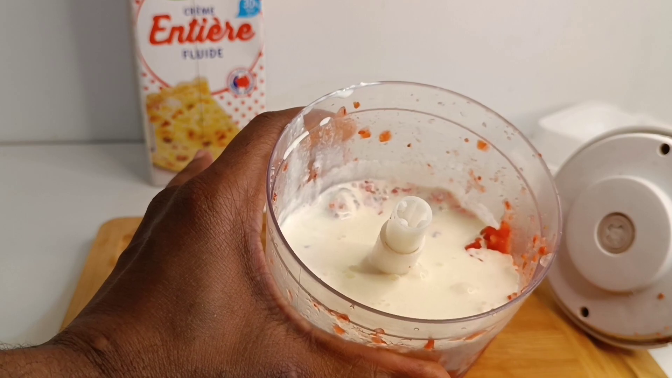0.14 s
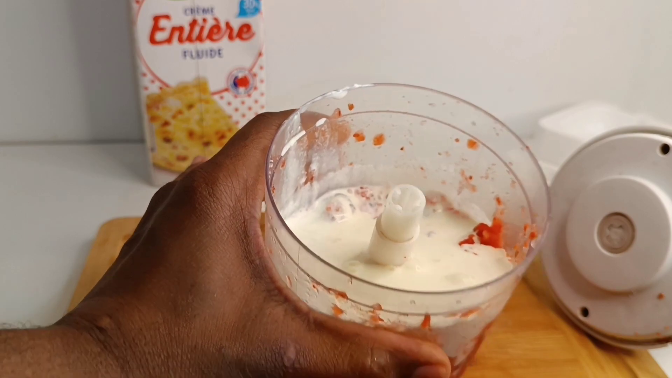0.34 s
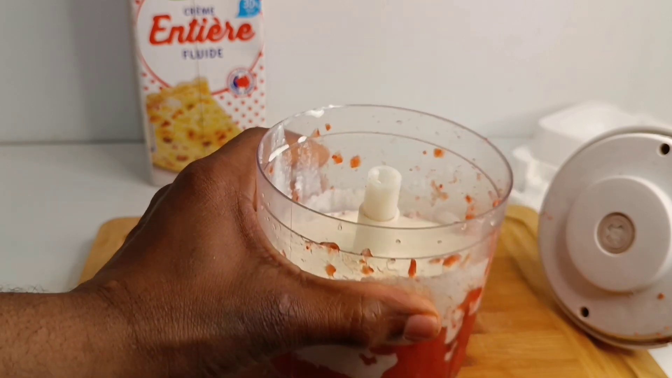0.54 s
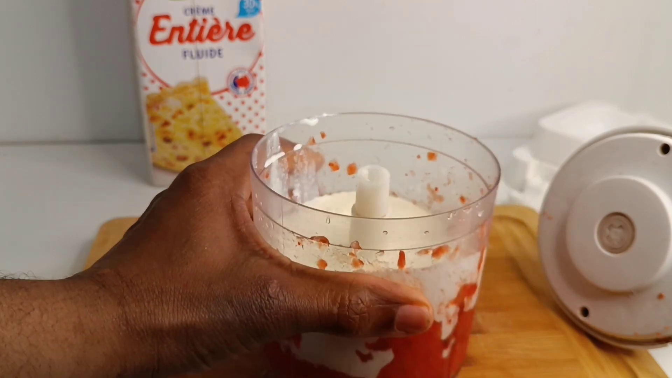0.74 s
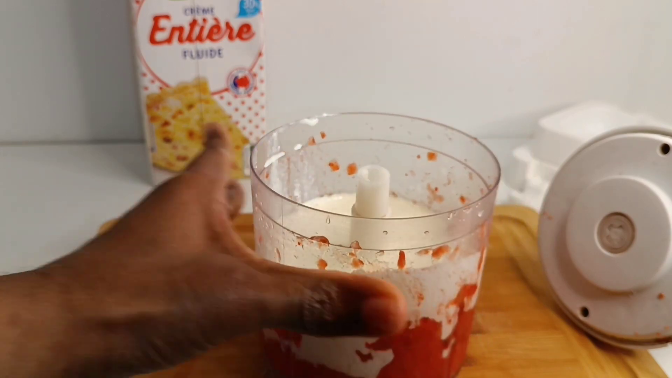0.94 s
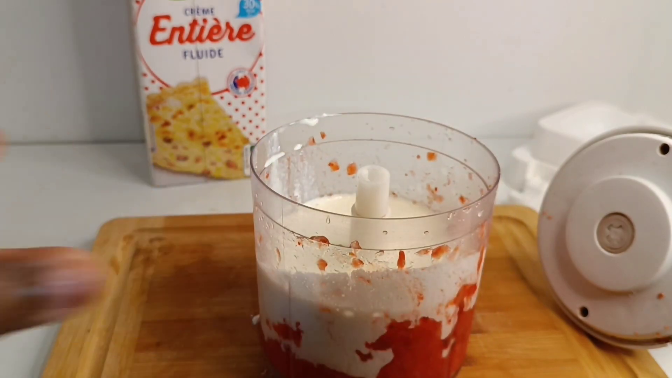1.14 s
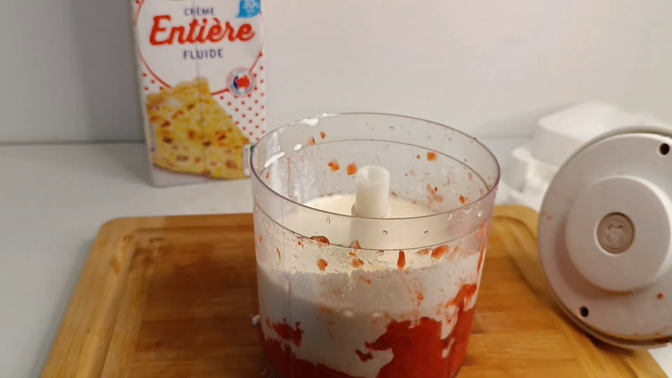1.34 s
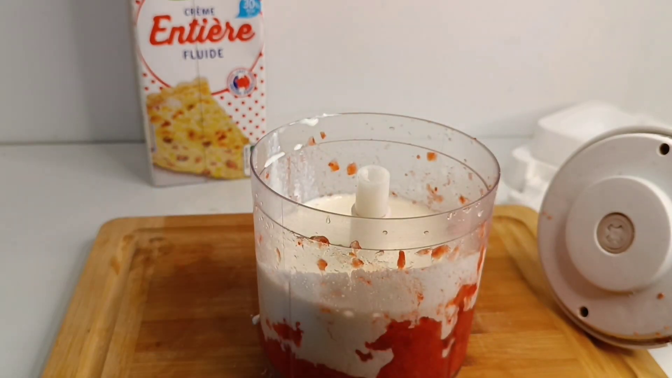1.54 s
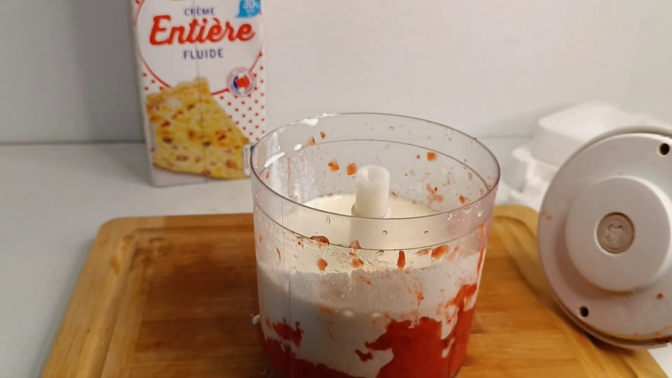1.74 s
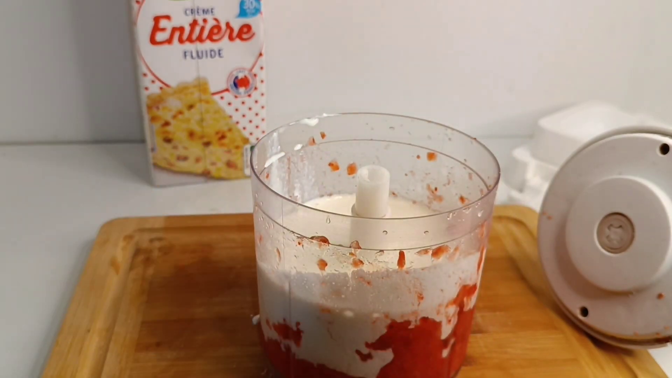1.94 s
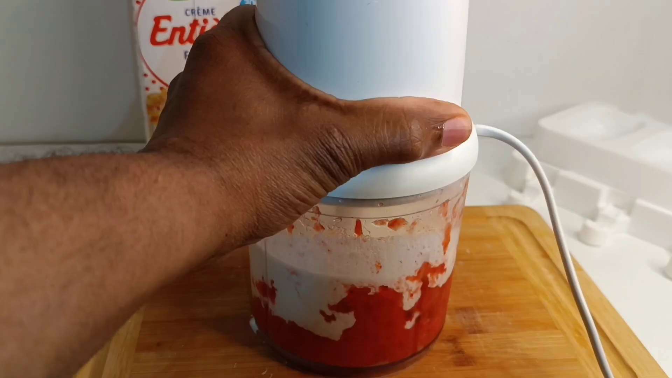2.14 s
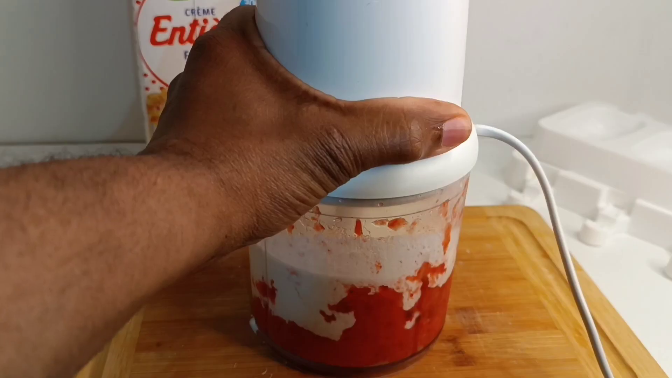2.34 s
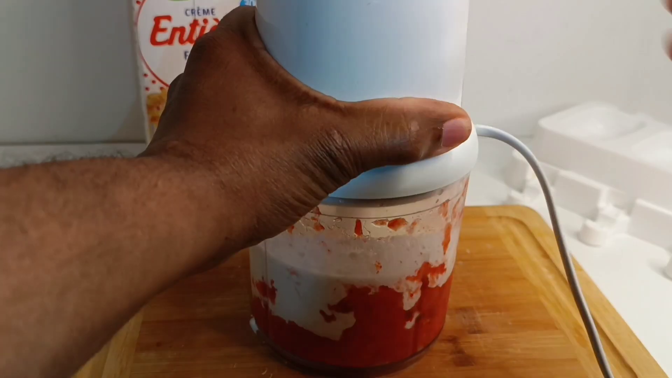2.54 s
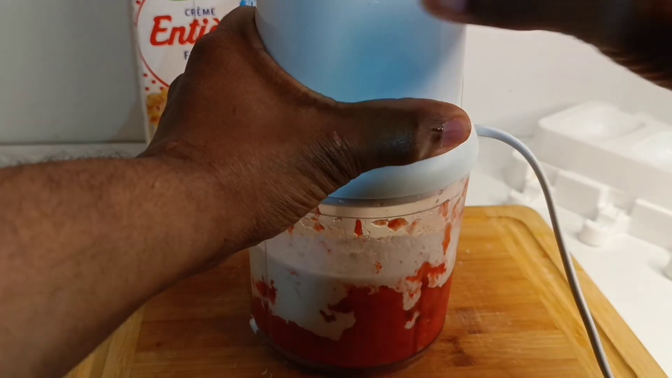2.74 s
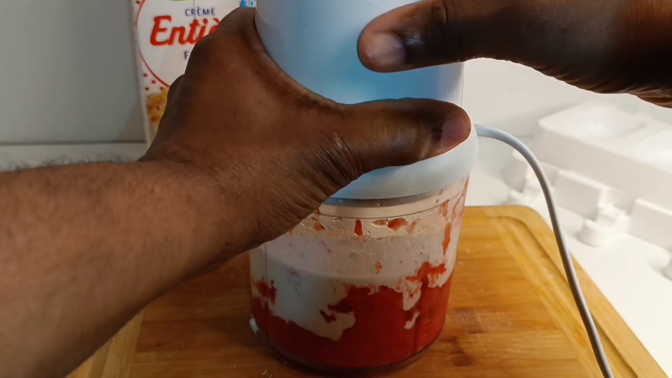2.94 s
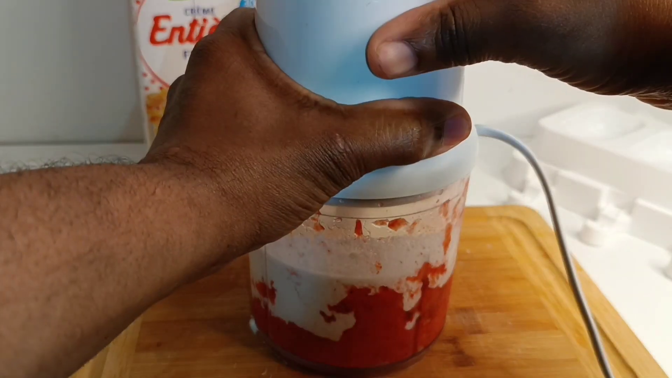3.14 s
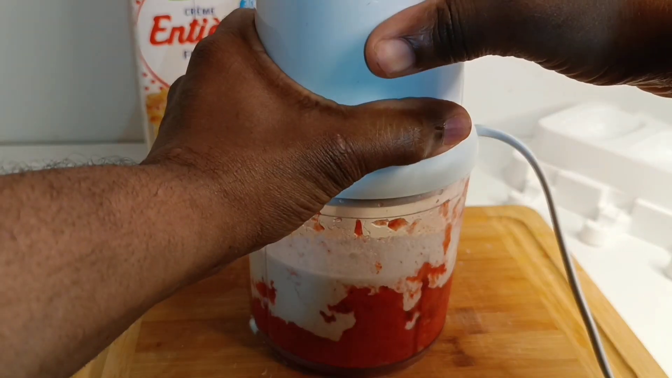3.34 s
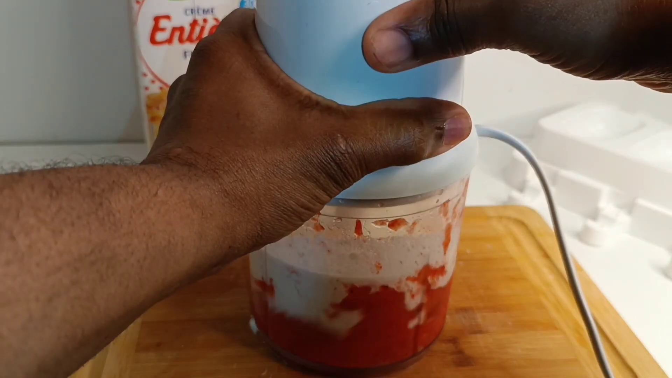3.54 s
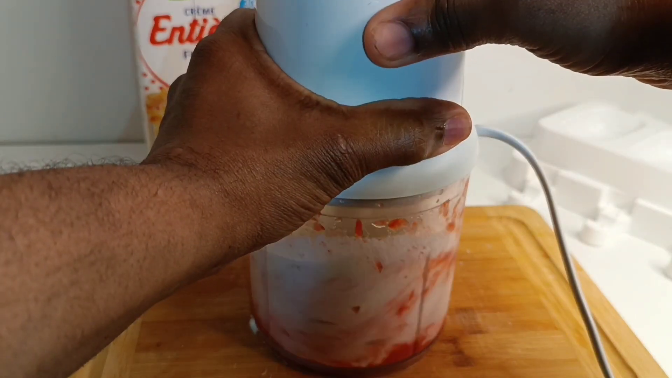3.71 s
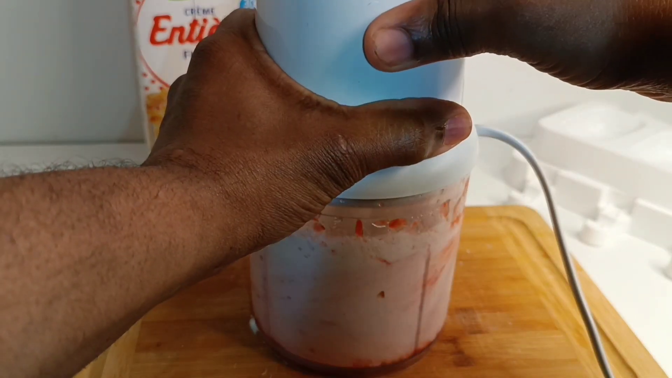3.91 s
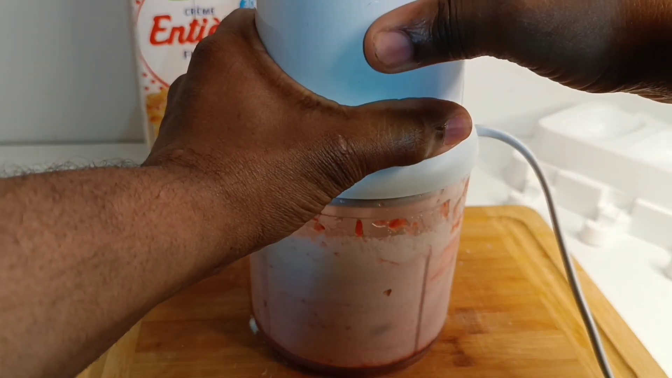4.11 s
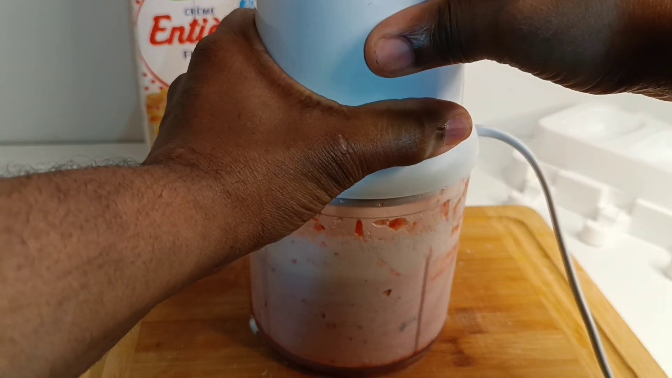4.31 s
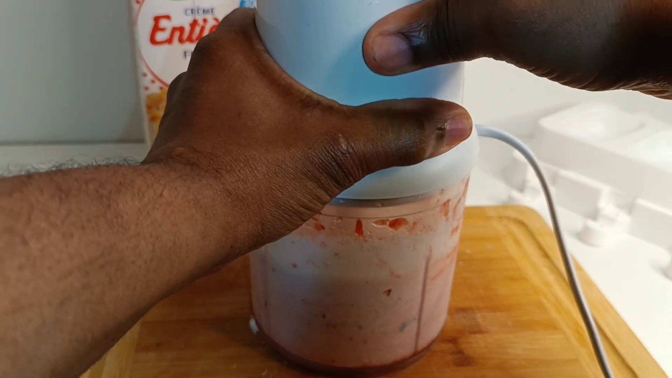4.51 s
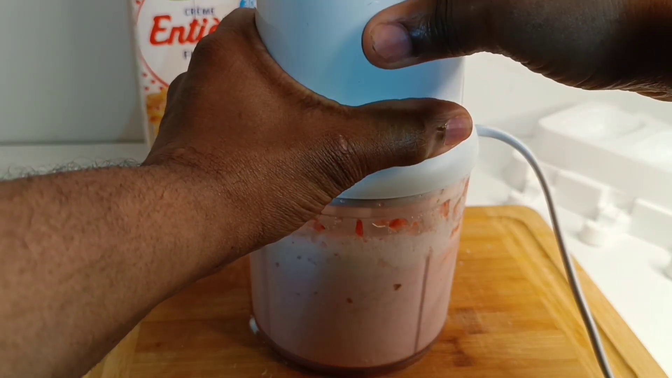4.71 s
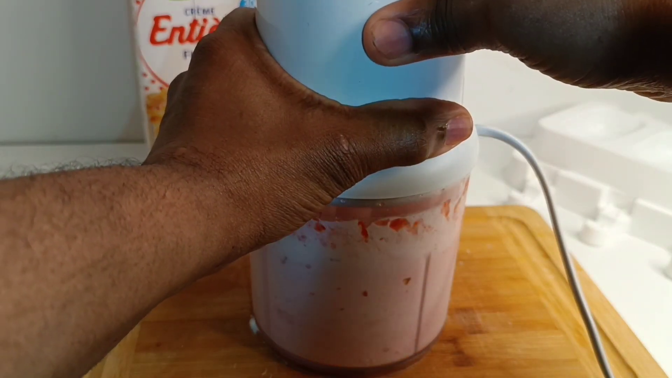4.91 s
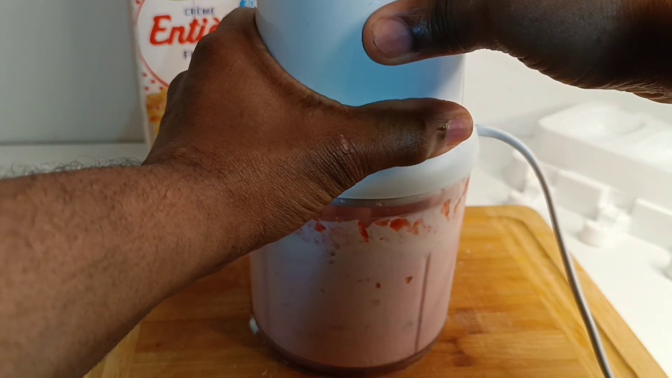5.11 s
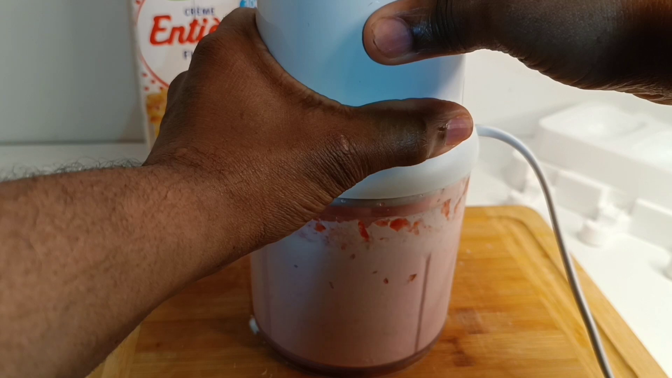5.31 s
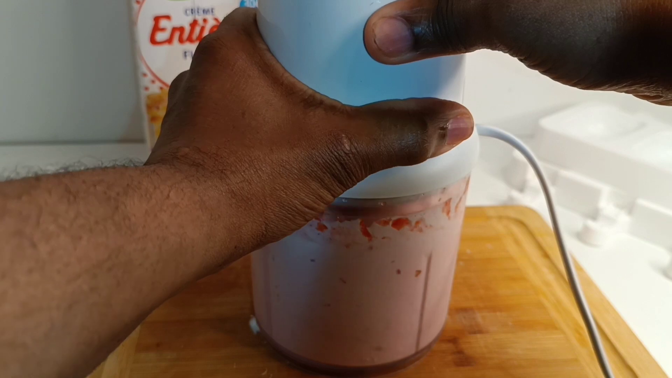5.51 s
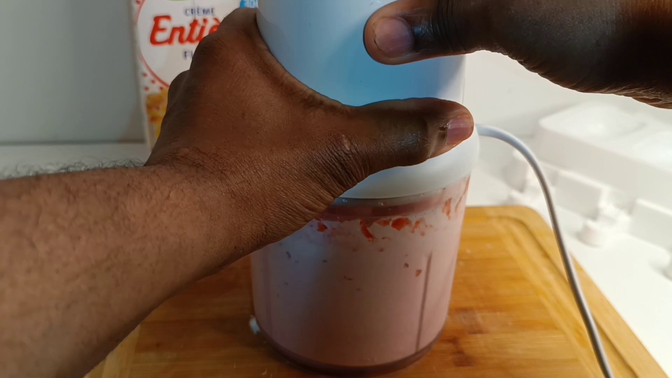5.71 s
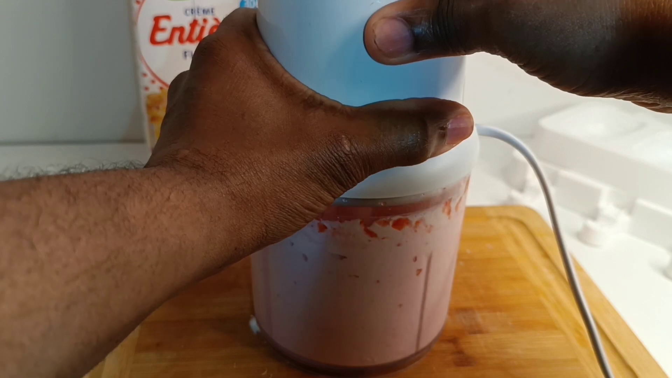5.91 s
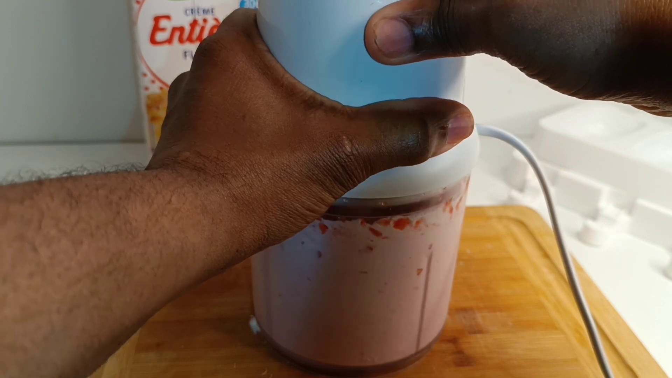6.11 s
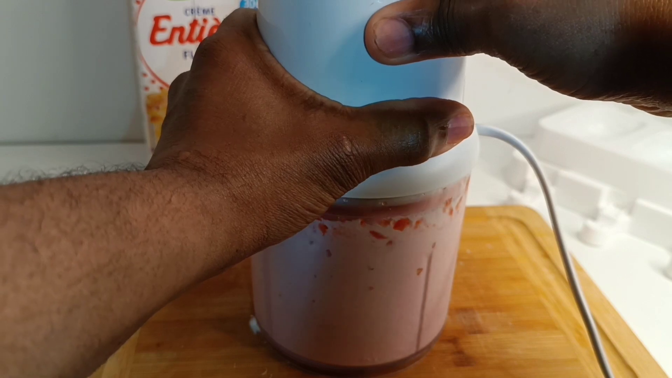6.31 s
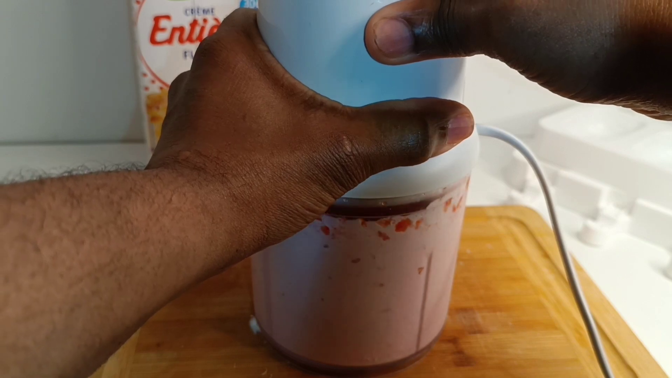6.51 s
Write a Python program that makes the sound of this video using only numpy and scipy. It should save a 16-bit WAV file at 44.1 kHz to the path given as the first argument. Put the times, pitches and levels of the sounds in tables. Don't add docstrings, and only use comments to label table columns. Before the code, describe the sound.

Close-up in a small, lightly echoing kitchen: one solid thud and clack of a bowl on board, a near-silent pause with faint skin-on-plastic rubs, then a scuff and knock as the motor head goes on. A brief rough motor burst winds down; a longer one spins up with humming, noisy chopping and a piercing whine that sags as fruit catches the blades.

```python
import sys
import numpy as np
from scipy import signal
from scipy.io import wavfile
from scipy.ndimage import uniform_filter1d

SR = 44100
rng = np.random.default_rng(int(sys.argv[2]) if len(sys.argv) > 2 else 0)


def decibels_to_gain(level_db):
    exponent = np.asarray(level_db, float) / 20
    return 10 ** exponent


def int16_out(signal):
    q = np.round(np.clip(np.atleast_2d(signal).T, -1, 1) * 32767)
    wavfile.write(sys.argv[1], SR, q.astype(np.int16))


N = 288855
TIME_S = np.arange(N) / SR
FIRST_RUN = TIME_S < 4.2

# frequency in Hz, width in Hz, boost in dB.
BOWL_MODES = [(151.3, 12, 5.5), (293.4, 17, 2), (448, 25, 7), (870, 140, 6.5), (1250, 27, 10),
              (1492.8, 94, 9), (1696.3, 52, 7.5), (1925, 59, 7.5), (2377, 100, 6), (2980, 150, 4),
              (4478, 31, 8), (5850, 186, 9.5), (6371, 63, 11.5), (7030, 300, 8)]
# time in seconds, peak level in dB.
LUMPS = [
    (3.91, -44),
    (5.152, -11),
    (5.18, -11),
    (5.242, -25),
    (5.409, -20),
    (5.46, -26),
    (5.5, -36),
    (6.032, -17.5),
]
# time in seconds, level in dB.
BLADE_LOAD = [
    [(3.258, -19.5), (3.29, -21), (3.46, -21), (3.6, -21), (3.708, -20.5), (3.824, -26.5), (3.92, -41.5),
     (3.994, -70), (4.1, -72)],
    [(4.284, -21), (4.87, -20), (5.0, -25), (5.11, -27.5), (5.3, -27.5), (5.47, -26), (5.6, -27),
     (6.55, -29.5)],
]
# time in seconds, half length in seconds, low-end gain in dB.
SLUMPS = [
    (3.447, 0.071, 4.5),
    (5.018, .04, 8),
    (5.385, .045, 9),
    (5.678, .06, 2.5),
    (6.311, .05, 2),
]
TOP_HZ = 2600
THAW_AT_S, THAW_S, THAW_FIZZ_DB, THAW_WOBBLE_DB = 4.89, 0.02, -5, -5


def rms_one(x):
    return x / np.sqrt(np.mean(x ** 2) + 1e-20)


def band(x, low_hz, high_hz, order=2):
    return signal.sosfilt(signal.butter(order, [low_hz, high_hz], "band", fs=SR, output="sos"), x)


def resonance(x, hz, width):
    r = np.exp(-np.pi * width / SR)
    poles = [1, -2 * r * np.cos(2 * np.pi * hz / SR), r * r]
    return signal.lfilter([(1 - r * r) / 2, 0, (r * r - 1) / 2], poles, x)


def boosted(x, peaks):
    for hz, width, boost_db in peaks:
        x = x + (decibels_to_gain(boost_db) - 1) * resonance(x, hz, width)
    return x


def at_hz(points, hz):
    points_hz, values = np.array(points).T
    return np.interp(np.log(hz), np.log(points_hz), values)


def drift(rate):
    r = np.exp(-80 * np.pi * rate / SR)
    slow = signal.lfilter([1], [1, -2 * r, r * r], rng.standard_normal(N // 40 + 2002))[2000:]
    return np.interp(np.arange(N) / 40, np.arange(len(slow)), rms_one(slow))


def sine(hz, jitter_hz, rate):
    return np.sqrt(2) * np.sin(2 * np.pi * np.cumsum(hz + jitter_hz * drift(rate)) / SR)


def step(at_s, length_s):
    return 0.5 + 0.5 * np.tanh((TIME_S - at_s) / length_s)


def bumps(times, lengths, heights):
    return sum(h * np.exp(-((TIME_S - s) / w) ** 2) for s, w, h in zip(times, lengths, heights))


def swells(rows):
    gain = 0
    for s, db, rise_s, fall_s in rows:
        below_peak = np.maximum((s - TIME_S) / abs(rise_s), (TIME_S - s) / abs(fall_s))
        gain = gain + decibels_to_gain(db - 20 * below_peak)
    return gain


def in_time(rows, fade_s=0.014):
    s, *columns = np.transpose(rows)
    inside_s = np.minimum(TIME_S - s[0] + fade_s, s[-1] + fade_s - TIME_S)
    gate = np.clip(inside_s / fade_s, 0, 1) ** 2
    return [gate] + [np.interp(TIME_S, s, c) for c in columns]


def banded(source, spectrum, patchy_db, low_db=0, high_db=0):
    # frequency in Hz, left-right likeness from 0 to 1.
    likeness = [(60, 1), (180, 0.91), (550, 0.65), (1650, 0.29), (4970, 0.22), (15000, 0.1)]
    # frequency in Hz, left minus right level in dB.
    left_lean = [(60, -2), (180, 2), (550, 1.5), (1650, 3.5), (4970, -3.5), (15000, 4)]
    out = 0
    edges = 28 * 2 ** (np.arange(29) / 3)
    for k, (low, high) in enumerate(zip(edges, edges[1:])):
        mid, side = band(source[k % 2], low, high)
        hz = np.sqrt(low * high)
        alike = np.clip(at_hz(likeness, max(hz, 61)), -1, 1)
        lean = at_hz(left_lean, max(hz, 61)) / 2
        tilt = low_db * at_hz([(400, 0.942), (800, 0)], hz) + high_db * at_hz([(3500, 0.14), (6000, 0.88)], hz)
        gain = decibels_to_gain(at_hz(spectrum, hz) + tilt + patchy_db * drift(11))
        pair = np.sqrt(1 + alike) * mid + np.sqrt(1 - alike) * side * [[1], [-1]]
        out = out + gain * decibels_to_gain(np.array([[lean], [-lean]])) * pair
    return rms_one(out)


def struck(times, levels_db, modes, spread_db):
    at, out = (np.array(times) * SR).astype(int), np.zeros(N)
    chance = rng.normal(0, 1, (len(at), len(modes)))
    for k, (hz, db, t60) in enumerate(modes):
        clicks = np.full(N, 1e-18)
        clicks[at] = decibels_to_gain(np.array(levels_db) + db + spread_db * chance[:, k])
        r, w = decibels_to_gain(-60 / (t60 * SR)), 2 * np.pi * hz / SR
        out += signal.lfilter([0, np.sin(w)], [1, -2 * r * np.cos(w), r * r], clicks)
    return out


def bursts(times, levels_db, t60, rise_s):
    out, t = np.zeros(N), np.arange(SR // 8) / SR
    noise = rng.standard_normal((len(times), len(t)))
    for s, db, row in zip(times, levels_db, noise):
        at = int(s * SR)
        out[at:at + len(t)] += decibels_to_gain(db - 60 * t / t60) * np.clip(t / rise_s, 0, 1) * row
    return out


def background():
    # frequency in Hz, density in dB per Hz.
    quiet = [(15, -45), (25, -13), (43, -12), (148, -4), (250, -7), (293, -9.5), (342, -4.5), (625, -17.5),
             (1600, -19.5), (2140, -16.5), (8120, -40.5), (13000, -44)]
    # frequency in Hz, rms level in dB.
    compressor = [(145.3, -80.5), (247.6, -78), (344.5, -77), (393.0, -91.5), (500.6, -86)]
    # time in seconds, level in dB, rise and fall in
    # seconds per 20 dB.
    rub_strokes = [
        (0.62, -74.5, 0.209, .25),
        (1.1, -75, .55, 0.4),
        (2.19, -76.5, 0.28, -3.8),
        (2.51, -55, 0.1, -0.16),
        (2.556, -44, 0.012, 0.01),
        (2.74, -71.5, .15, -1),
    ]
    # frequency in Hz, density in dB per Hz.
    rub_colour = [(470, -36.5), (800, -7.5), (1340, -20), (1750, -8), (2080, -12.5), (6380, -5),
                  (12000, -26.5), (15500, -18.5)]
    # time in seconds, level in dB, rise and fall in seconds per 20 dB.
    shakes = [
        (1.022, -67, .05, .05),
        (1.22, -69, .08, .07),
        (1.47, -63, .12, .22),
        (1.62, -65, .2, .04),
        (2.06, -70, .07, .2),
        (2.24, -66, .15, .05),
        (2.5, -76, .1, .03),
    ]
    white = rng.standard_normal((2, 2, N))
    room = decibels_to_gain(-71 + 0.5) * banded(white, quiet, 1.1)
    fridge = sum(decibels_to_gain(db + 2.5 * drift(9.8)) * sine(hz, 2.7, 12) for hz, db in compressor)
    rub = swells(rub_strokes) * banded(white[::-1, ::-1, ::-1], rub_colour, 1.7)
    shake = swells(shakes) * rms_one(resonance(white[0, 0, ::-1], 120, 28))
    return room + fridge + rub + shake


def knocks():
    # time in seconds, board thud, plastic clack and latch tick in dB, clack centre in Hz.
    contacts = [(0.308, -39, -80, -89, 600), (0.366, -16, -9, -58, 660), (1.001, -67, -75, -78, 603),
                (1.639, -65, -70.5, -82.5, 1740), (2.194, -62, -54.5, -76, 900),
                (2.391, -74.5, -54, -65, 1250), (2.552, -30.5, -31, -59, 690),
                (2.992, -33, -44.5, -42, 600), (3.188, -65, -72.5, -49.5, 875),
                (3.968, -46.5, -64.5, -66, 754), (4.111, -54, -52.5, -72, 770),
                (4.152, -43, -73.5, -50.5, 748), (4.172, -47, -73, -56, 600)]
    # frequency in Hz, level in dB, 60 dB decay in seconds.
    board = [(100, -6, 0.47), (148, -6, 0.56), (160.4, 0, .35), (209, -5.5, 0.27), (287.6, -12, 0.24),
             (352, -9, 0.069), (55.12, -11, 0.5)]
    # frequency in Hz, width in Hz, boost in dB.
    plastic = [(621, 60, 7), (760, 92, 1.5), (980, 61, 0), (1200, 200, 5.5), (1530, 68, 3), (1830, 150, 0),
               (2192, 120, 6.5), (2365, 100, 3.5), (2947, 210, 1.5), (3600, 200, 5.5)]
    # frequency in Hz, width in Hz, boost in dB.
    latch = [(4840, 90, 12), (6100, 400, 9.9), (9300, 700, 3.4), (10700, 760, 1.9)]
    # time in seconds, level in dB, rise and fall in seconds per 20 dB.
    seat_booms = [
        (2.556, -32, .002, .035),
        (2.6, -52, .04, .3),
        (3.917, -36, .005, .05),
    ]
    s, thud_db, clack_db, tick_db, centre_hz = np.transpose(contacts)
    s = s + 0.0013
    held = s > 2.0
    damped = [(hz, db, t60 * 0.642) for hz, db, t60 in board]
    free_thud = struck(s[~held], thud_db[~held] - 3.5, board, spread_db=0.0)
    held_thud = struck(s[held], thud_db[held] - 2.5, damped, spread_db=3.5)
    thud = band(free_thud + held_thud, 60, 630)
    clack = sum(resonance(bursts([at], [db + 14.5], 0.039, 0.003), hz, 1.2 * hz)
                for at, db, hz in zip(s, clack_db, centre_hz))
    tick = boosted(band(bursts(s, tick_db + 3.0, 0.028, 0.0008), 3000, 17000), latch)
    lumps = band(bursts(*np.transpose(LUMPS), 0.066, 0.0014), 660, 1520) * decibels_to_gain(7.0)
    seat = swells(seat_booms) * rms_one(band(rng.standard_normal(N), 330, 1000))
    return thud, band(boosted(clack + lumps, plastic), 290, 3200) + tick + seat


def kitchen(x):
    # low edge in Hz, high edge in Hz, 60 dB decay in seconds, level in dB.
    echo_bands = [(59.6, 650, 0.39, 4.5), (680, 4380, 0.46, -0.5), (3500, 21000, 0.39, -5.5)]
    t = np.arange(SR // 2) / SR
    tail = sum(decibels_to_gain(db - 60 * t / t60) * band(rng.standard_normal((2, len(t))), low, high)
               for low, high, t60, db in echo_bands)
    tail = tail * np.clip(t / 0.012, 0, 1) / np.sqrt(SR / 40)
    return signal.fftconvolve(x[None], tail, axes=1)[:, :N]


def speed():
    # start in seconds (the sound enters already turning), off in seconds, slot rate at the
    # start in Hz, tone in dB, time it settles in seconds.
    presses = [
        (3.258, 3.605, 981.3, -26.5, 3.704),
        (4.285, 7.0, 1078, -28, 4.54),
    ]
    creep_hz_per_s, spin_up_s, coast_s = 10, 0.112, 0.14
    settle_db, settle_length_s = -9.5, 0.03
    runs = []
    for on_s, off_s, first_hz, db, settle_s in presses:
        since = np.clip(TIME_S - on_s, 0, off_s - on_s)
        hz = TOP_HZ + creep_hz_per_s * since - (TOP_HZ - first_hz) * np.exp(-since / spin_up_s)
        coasting = np.exp(-np.maximum(TIME_S - off_s, 0) / coast_s)
        runs.append([hz * coasting, db + settle_db * step(settle_s, settle_length_s)])
    return np.where(FIRST_RUN, *runs)


def caught():
    # time in seconds, half length in seconds, mesh sag in Hz, whine loss in dB.
    catches = [
        (5.03, .025, 70, 4),
        (5.185, .04, 290, 8),
        (5.37, .03, 90, 3),
        (5.46, .055, 330, 2),
        (5.64, .05, 40, 4),
        (5.75, .05, 260, 11),
        (5.99, .07, 80, 0),
        (6.09, .04, 400, 10),
        (6.23, .035, -110, 2),
        (6.345, .06, 170, -4),
    ]
    s, length_s, sag_hz, loss_db = np.transpose(catches)
    return bumps(s, length_s, sag_hz), bumps(s, length_s, loss_db)


def chopping():
    # frequency in Hz, density in dB per Hz.
    roar_colour = [(24, -60.5), (40, -31), (98, -7.5), (179, -6.5), (305, -4), (533, -18), (865, -16),
                   (1100, -19), (1240, -15.5), (2120, -18), (2450, -10.5), (4170, -20.5), (5440, -19.5),
                   (8620, -33), (13000, -45)]
    # time in seconds, hum in dB, rise and fall in s per 20 dB.
    surges = [
        [(3.3, -28, .3, .3), (3.5, -23, .45, .15), (3.65, -24, .06, .07), (3.85, -30, .2, .06)],
        [(4.44, -23, .4, .2), (4.7, -24.5, .4, .55), (5.07, -23, .08, .1), (5.225, -23, .065, .11),
         (5.47, -26, .12, .11), (5.68, -30, .2, .22), (5.97, -32, .1, .13), (6.15, -27, .12, .17),
         (6.42, -37, .3, .15)],
    ]
    on, roar_db = np.where(FIRST_RUN, in_time(BLADE_LOAD[0]), in_time(BLADE_LOAD[1]))
    speed_db = np.maximum(20 * np.log10(speed()[0] / TOP_HZ), -12)
    swell_db = bumps([s for s, _ in LUMPS], [0.028] * len(LUMPS), [3.5] * len(LUMPS))
    boom_db = -3.5 - 0.8 * speed_db - 1 * caught()[0] / 300 - swell_db + bumps(*np.transpose(SLUMPS))
    fizz_db = -9 + 1.09 * speed_db + THAW_FIZZ_DB * step(THAW_AT_S, THAW_S) - swell_db
    grains = (rng.random(N) < 700 / SR) * decibels_to_gain(2.5 * np.minimum(rng.exponential(1, N), 3))
    torque = 1 + 0.1 * np.sin(2 * np.pi * 110.0 * TIME_S)
    drive = rng.standard_normal((2, 2, N)) * torque * (2.2 + uniform_filter1d(grains, size=120) * 25)
    roar = banded(boosted(drive, BOWL_MODES), roar_colour, 1.93, boom_db + 0.4, fizz_db + 13.5)
    hum = np.where(FIRST_RUN, swells(surges[0]), swells(surges[1]))
    hum = hum * decibels_to_gain(0.7) * sine(100.2, 2.7, 24)
    return on * decibels_to_gain(roar_db + swell_db + 4.0) * roar, on * hum


def rotor():
    hz, db = speed()
    powered = in_time(BLADE_LOAD[0])[0] + in_time(BLADE_LOAD[1])[0]
    on = powered * np.clip(hz / 780 * 10 - 9, 0, 1)
    phase = 2 * np.pi * np.cumsum(hz * (1 + 0.014 * drift(60))) / SR
    slots = sum(decibels_to_gain(h_db) * (0.9 + 0.7 * drift(50)) * np.sin(k * phase)
                for k, h_db in [(1, 2.5), (2, -7), (3, -6)])
    wobble_db = -29.5 + 1.2 * 20 * np.log10(hz / TOP_HZ) + THAW_WOBBLE_DB * step(THAW_AT_S, THAW_S)
    wobble_db = wobble_db - 3.5 * caught()[0] / 300 + bumps(*np.transpose(SLUMPS))
    wobble = decibels_to_gain(wobble_db + 2.3 * drift(11.0)) * np.sin(phase / 8)
    return on * decibels_to_gain(db) * boosted(slots * (1 + 0.4 * drift(200)), BOWL_MODES) * decibels_to_gain(-2.0), on * wobble


def coupling_squeak():
    # time in seconds, level in dB, rise and fall in seconds per 20 dB.
    bites = [
        (4.36, -37, 0.033, .05),
    ]
    return swells(bites) * rms_one(band(rng.standard_normal((2, N)), 14300, 16300))


def gears():
    # offset from the mesh rate in Hz, level in dB.
    planets = [(-262, -20), (-131, -4), (-0.5, 7.5), (131.5, -2), (262.5, -9), (390, -14)]
    # frequency in Hz, width in Hz, boost in dB.
    gearbox = [(5270, 59, 7.5), (5450, 70, 3), (5630, 130, 5.5), (5690, 93, 8.5)]
    from_s, mesh_hz, creep_hz_per_s, lag_hz, spin_s = 4.5, 5340, 105, 200, 0.06
    whine_db, start_db, grow_s = -26, -6.5, 0.41
    since = np.maximum(TIME_S - from_s, 0)
    sag_hz, loss_db = caught()
    on = step(from_s, 0.0175)
    hz = mesh_hz + creep_hz_per_s * since - lag_hz * np.exp(-since / spin_s) - sag_hz
    db = whine_db + start_db * np.clip(1 - since / grow_s, 0, 1) - loss_db
    lines = sum(decibels_to_gain(line_db + 3.84 * drift(16.6)) * sine(hz + off_hz, 24, 45) for off_hz, line_db in planets)
    whine = rms_one(on * band(boosted(lines, gearbox), 4950, 5830, order=3))
    return on * decibels_to_gain(db + 1.5) * whine * 0.67


def scene():
    thud, clack = knocks()
    roar, hum = chopping()
    slots, wobble = rotor()
    whine = gears()
    near = (thud + clack + slots + wobble) * decibels_to_gain(np.array([[0.8], [-0.8]])) + hum + roar
    near[1, 3:] = near[1, :-3].copy()
    gearbox = np.array([whine * decibels_to_gain(-1.9), np.r_[0, 0, whine[:-2]] * decibels_to_gain(-0.7)])
    echoes = decibels_to_gain(-5.0) * kitchen(clack + 0.47 * thud) + decibels_to_gain(-1.5) * kitchen(slots + 0.7 * whine)
    return near + gearbox + coupling_squeak() + echoes + background()


def low_pass(x):
    return signal.sosfilt(signal.butter(12, 16890, fs=SR, output="sos"), x)


def record(dry):
    x = boosted(dry, [(14900, 490, 6.9), (15300, 550, 10), (15800, 500, 7.3)])
    x = 0.77 * np.tanh(x / 0.81)
    x = signal.sosfilt(signal.butter(2, 38, "high", fs=SR, output="sos"), x)
    x = signal.sosfilt(signal.cheby2(12, 60, 16250, fs=SR, output="sos"), x)
    return low_pass(x)


dry = scene()
out = record(dry)
int16_out(out)
```